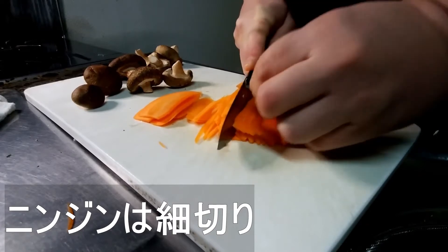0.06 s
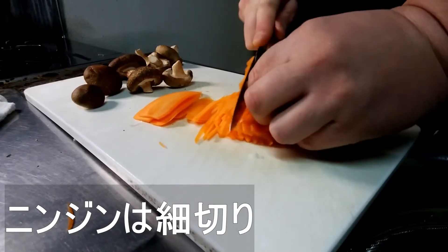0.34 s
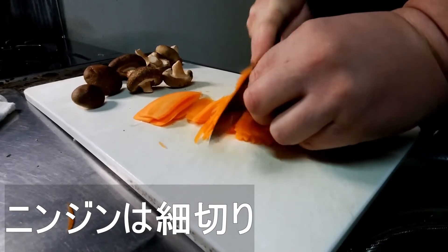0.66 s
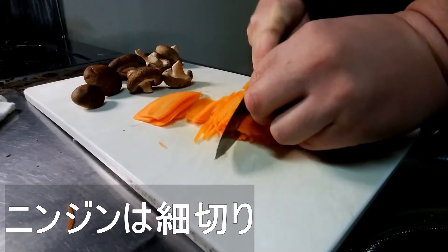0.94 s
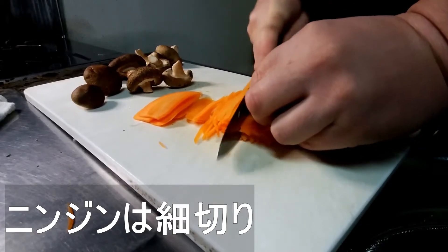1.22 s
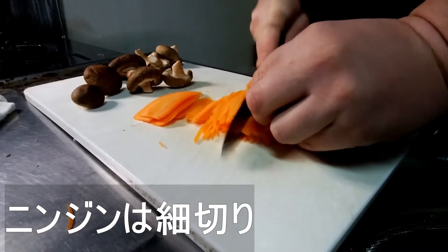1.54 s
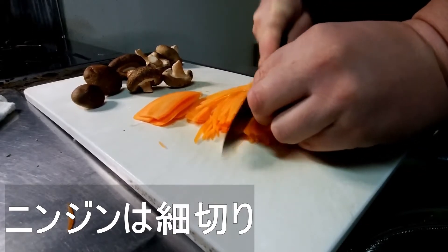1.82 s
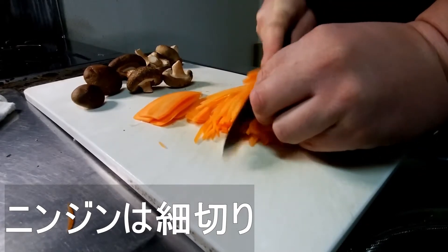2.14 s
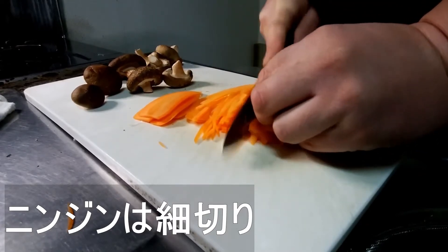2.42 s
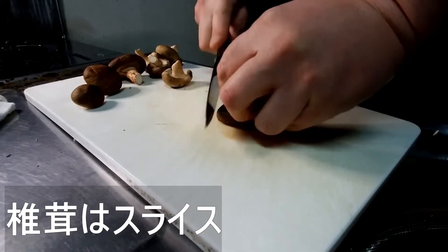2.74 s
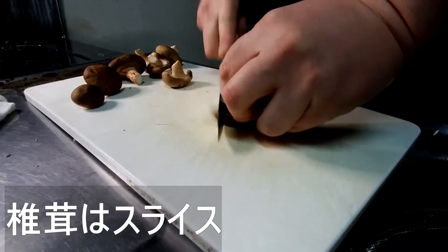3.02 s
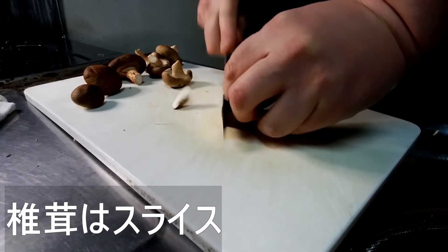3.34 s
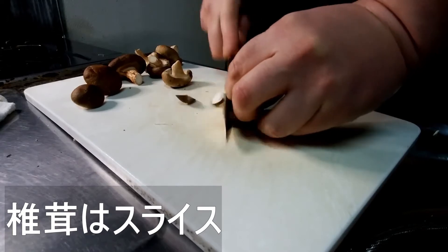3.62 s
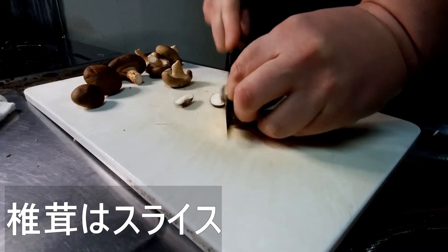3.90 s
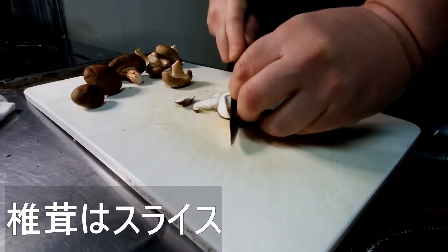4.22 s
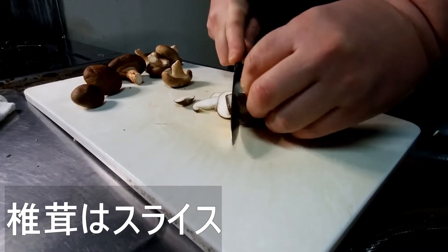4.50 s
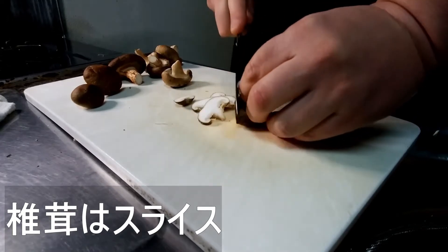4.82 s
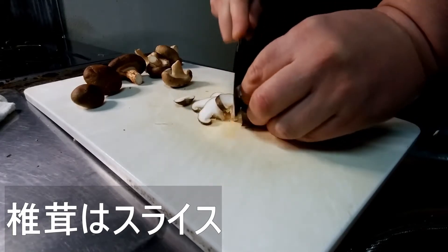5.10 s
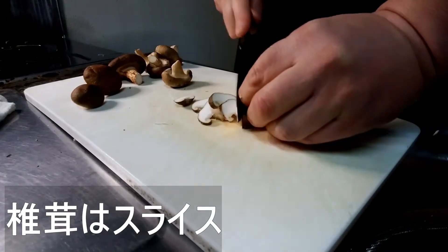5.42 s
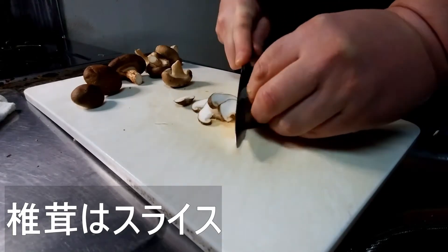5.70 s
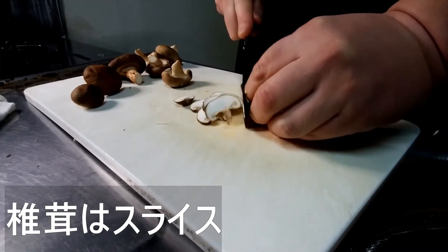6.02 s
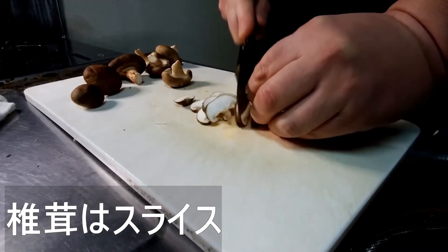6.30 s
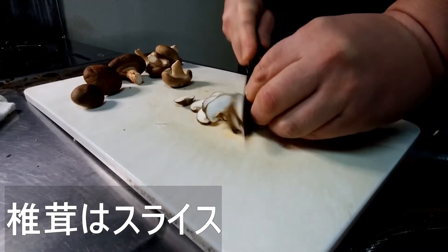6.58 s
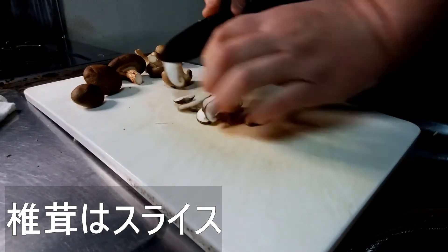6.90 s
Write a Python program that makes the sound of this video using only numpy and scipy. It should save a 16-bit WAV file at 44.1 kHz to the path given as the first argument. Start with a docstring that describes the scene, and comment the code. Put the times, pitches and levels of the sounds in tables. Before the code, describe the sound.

After a few soft bumps of food being shifted, a kitchen knife chops carrot in eight even strokes, each a crisp crunch ending in a boomy knock on a plastic board. The ringing cuts off abruptly. Ten softer-cutting strokes through mushrooms follow, broken by two short pauses, then a light tap. It sounds close, in a small kitchen with faint rumble and hiss.

```python
"""Faint room rumble and hiss, soft bumps of food shifted on a plastic cutting board, then a kitchen knife:
eight strokes through carrot, whose ringing stops abruptly, ten through mushrooms, a last light tap.
Each stroke ticks into the food and presses it down, crunches through its cells, knocks the board, which
booms on its counter in a small kitchen, and lifts past the slice. A peak limiter flattens the knocks."""
import sys
import numpy as np
from scipy import signal
from scipy.fft import rfft, irfft, next_fast_len
from scipy.io import wavfile
from scipy.ndimage import uniform_filter1d, minimum_filter1d, map_coordinates

SR = 44100
rng = np.random.default_rng(int(sys.argv[2]) if len(sys.argv) > 2 else 0)


def dump(signal):
    """Clip the signal to [-1, 1] and save it as 16-bit WAV at the path in sys.argv[1]."""
    limited = np.clip(np.atleast_2d(signal).T, -1, 1)
    pcm = np.round(limited * 32767).astype(np.int16)
    wavfile.write(sys.argv[1], SR, pcm)


N = 315296

# room rumble: freq_hz, density_db
RUMBLE_SPECTRUM = [(18, -39), (30, -16.5), (69, 12), (119, -4.5), (157, 7), (285, -15.5), (802, -23),
                   (886, -23), (2090, -40.5), (3500, -52), (4550, -67), (7700, -120)]
# hiss: freq_hz, density_db
HISS_SPECTRUM = [(1000, -14), (2200, -5), (3000, -10), (4500, -15), (6000, -14.5), (7600, 2), (9000, -5),
                 (11000, -3), (13000, -16), (16000, -7)]
# wavering of the hiss: time_s, level_db
HISS_ENVELOPE = [(0.0, -56), (0.63, -59.5), (2.61, -56.5), (2.81, -62.5), (3.92, -58.5), (4.84, -64),
                 (5.2, -58.5), (6.03, -65.5), (6.33, -59.5), (7.15, -61)]
# hand shifting the food: start_s, level_db, boom_hz
NUDGES = [(0.009, -28.5, 155), (0.167, -17, 153), (0.411, -23, 93), (0.469, -24.5, 88), (2.876, -24, 89),
          (3.031, -17, 82), (6.659, -20.5, 166), (6.763, -21, 81)]
# board, counter and low room resonances: freq_hz, level_db, t60_s
BOARD_MODES = [(60.45, -20, 1), (77, 2, 0.17), (90.06, -6, 0.53), (116.2, -13, 0.73), (154.07, -7.5, 0.79),
               (168.9, -12.5, 1), (184, -7, 0.24), (204.9, -10, 0.97), (262.4, -10.5, 0.13),
               (314.5, -7, 0.37), (391.7, -19.5, 0.59), (438, -25, 0.21), (476.4, -18, 0.23),
               (526, -45, 0.29), (618.4, -8.5, 0.13), (692.6, -8.5, 0.21), (792, -25, 0.26),
               (842, -9, 0.24), (869, -5, 0.044), (889, -11, 0.25), (1199, -12, 0.16), (1214, -14, 0.32),
               (1470, -36, 0.2), (1642, -21, 0.11), (1594, -10, 0.15), (1854, -14.5, 0.12),
               (1973, -15.5, 0.32), (2580, -25.5, 0.28)]
# knife strokes: land_s, knock_db, hardness_oct, cut_s, crunch_db, entry_db, push_db, push_hz
STROKES = [(0.606, -14, 1.12, .112, -18, -26, -20, 201.7), (0.9293, -13, -0.22, 0.1, -18.5, -36, -17, 170),
           (1.2265, -13, 0.84, .063, -16.5, -35, -7.5, 161),
           (1.518, -14, 0.11, 0.074, -15, -18.5, -11.5, 175),
           (1.8097, -13, 0.16, 0.078, -16.5, -23.5, -12.5, 173),
           (2.1119, -13.5, 0.44, 0.078, -17, -28, -11.5, 84),
           (2.399, -14.5, 0.59, 0.062, -17.5, -20.5, -15.5, 77),
           (2.7058, -15.5, 0.51, 0.078, -17.5, -23.5, -18, 80),
           (3.1242, -17, -0.29, 0.027, -34, -27, -23, 170),
           (3.4361, -13.5, 0.082, 0.057, -34, -29, -20, 70),
           (3.726, -11.5, 0.18, 0.052, -31.5, -30, -17.5, 74),
           (4.0067, -14, -0.044, .047, -32.5, -28, -17.5, 95),
           (4.2965, -14.5, 0.0043, .059, -32.5, -39, -17, 78),
           (5.0313, -14.5, -0.15, 0.074, -31.5, -37, -21, 97),
           (5.3209, -18.5, -0.82, .04, -30.5, -29, -14, 176),
           (5.6169, -18.5, -0.97, 0.046, -32.5, -31, -13.5, 178),
           (6.1985, -14, 0.2, 0.04, -28, -36, -25, 81), (6.5378, -18, -0.5, 0.044, -31.5, -31, -20.5, 81),
           (6.8276, -33, -0.41, 0.019, -50, -58, -43, 85)]
# how each food takes the blade:
# swell_db, curve: crunch growth; slide_s, slide_db: its fade after landing; wet_db, t60: its reverb
# snap_db (re crunch), snap_depth (fraction of the cut): flesh splits
# give_db (re knock), give_hz: food yields; weight_db (re knock), weight_hz: arm's weight lands
# heel_db (re knock, at hardness 0): blade heel lands; lift_db, rebound_db: slice tick, boom on lifting
CARROT = dict(swell_db=28.5, curve=1.18, snap_db=-4, snap_depth=0.78, slide_s=0.0037, slide_db=-9.5, give_db=-1.5, give_hz=220, weight_db=-2, weight_hz=145, heel_db=-13.5, lift_db=-35, rebound_db=-19, wet_db=-9, t60=0.32)
MUSHROOM = dict(swell_db=19.5, curve=0.89, snap_db=-2, snap_depth=0.83, slide_s=0.015, slide_db=-0.5, give_db=-7, give_hz=133, weight_db=0, weight_hz=146, heel_db=-19.5, lift_db=-45, rebound_db=-42.5, wet_db=-7.5, t60=0.43)
# bursting plant cells: freq_hz, density_db
CELL_SPECTRUM = [(150, 17.5), (350, 11), (750, 6), (1200, -9.5), (2000, -5), (3100, -1.5), (4000, -4),
                 (6000, -2), (7600, 4.5), (9000, 0), (11200, 2.5), (12800, -16.5), (16000, -15)]
# loose slices touching the blade: start_s, level_db
SLICE_TICKS = [(2.8833, -35.5), (3.5823, -31.5), (3.8097, -35), (5.1943, -29), (5.6845, -27), (5.791, -43),
               (6.6576, -33.5)]
# wash of close overtones in a knock: freq_hz, density_db
WASH_SPECTRUM = [(35, -30.5), (75, -1.5), (128, -18.5), (162, -8), (250, -8), (600, -12.5), (900, -10),
                 (970, -31.5), (1120, -22), (1200, -18.5), (2000, -17.5), (3100, -18), (3900, -23.5),
                 (12000, -24.5)]
# decay of the wash: freq_hz, t60_s
WASH_DECAY = [(100, 0.78), (400, 0.26), (900, 0.37), (1600, 0.33), (2800, 0.27), (8000, 0.36)]
CARROT_END_S = 2.755


def amp(db):
    """Decibels to gain."""
    return 10 ** (np.asarray(db) / 20)


def unit_rms(x):
    """x at rms 1."""
    return x / np.sqrt(np.mean(x ** 2) + 1e-20)


def log_interp(points, hz):
    """Read (freq_hz, value) points on a log axis."""
    freq_hz, values = np.transpose(points)
    return np.interp(np.log(hz + 1), np.log(freq_hz), values)


def shaped(x, spectrum):
    """Minimum-phase filter x by a spectrum; output at rms 1."""
    size = 2 * next_fast_len(len(x) // 2 + 2048)
    gain = amp(log_interp(spectrum, np.fft.rfftfreq(size, 1 / SR)))
    cepstrum = irfft(np.log(gain + 1e-6), size)
    cepstrum[1:size // 2] *= 2
    cepstrum[size // 2 + 1:] = 0
    return unit_rms(irfft(rfft(x, size) * np.exp(rfft(cepstrum)), size)[:len(x)])


def add(track, at_s, sound, lag_s=0):
    """Mix in at at_s + lag_s; carrot sounds stop dead at CARROT_END_S."""
    start = max(round((at_s + lag_s) * SR), 0)
    end = round(CARROT_END_S * SR) if at_s < CARROT_END_S else N
    sound = sound[:max(end - start, 0)]
    track[start:start + len(sound)] += sound


def food_at(time_s):
    """Carrot first, then mushrooms."""
    return CARROT if time_s < CARROT_END_S else MUSHROOM


def background(rumble_db=-45.5, hiss_trim_db=0.5):
    """Low room rumble under a faint, wavering hiss."""
    hiss_db = hiss_trim_db + np.interp(np.arange(N) / SR, *np.transpose(HISS_ENVELOPE))
    rumble = amp(rumble_db) * shaped(rng.standard_normal(N), RUMBLE_SPECTRUM)
    hiss = amp(hiss_db) * shaped(rng.standard_normal(N), HISS_SPECTRUM)
    return rumble + hiss


def mode_rings(build_cycles=0.62):
    """One second of each mode; low ones build up more slowly."""
    t = np.arange(SR) / SR
    rings = []
    for k, (hz, db, t60_s) in enumerate(BOARD_MODES):
        envelope = amp(db - 60 * t / t60_s) * (1 - np.exp(-t * hz / build_cycles))
        rings.append((-1) ** k * envelope * np.sin(2 * np.pi * hz * t))
    return np.array(rings)


def thump(rings, db, boom_hz, damping_s=0.077, press_s=0.0023, reach=1.127, scatter_db=1.5):
    """Dull push on the board: slower pushes reach lower modes; the resting hand damps them."""
    t = np.arange(SR) / SR
    ratio = np.array(BOARD_MODES)[:, 0] / (reach * boom_hz)
    strength = amp(scatter_db * rng.standard_normal(len(rings))) * ratio / (1 + ratio ** 4)
    boom = strength @ rings * (1 - np.exp(-t / press_s)) * np.exp(-t / damping_s)
    return amp(db - 2) * boom / np.abs(boom).max()


def thumps(rings, give_lead_s=0.02117, rebound_lag_s=0.19, rebound_hz=160):
    """The board booms as the blade enters, the food yields, the blade lands and lifts, the hand nudges."""
    track = np.zeros(N)
    for land_s, knock_db, _, cut_s, _, _, push_db, push_hz in STROKES:
        food = food_at(land_s)
        add(track, land_s, thump(rings, push_db, push_hz), -cut_s)
        add(track, land_s, thump(rings, knock_db + food["give_db"], food["give_hz"]), -give_lead_s)
        add(track, land_s, thump(rings, knock_db + food["weight_db"], food["weight_hz"], damping_s=0.028))
        add(track, land_s, thump(rings, food["rebound_db"], rebound_hz), rebound_lag_s)
    for start_s, db, boom_hz in NUDGES:
        add(track, start_s, thump(rings, db, boom_hz))
    return track


def tick(db, decay_s=0.0065, rise_s=0.00078, highpass_hz=2000, room_db=-20, room_t60_s=0.38):
    """Blade touching food: a thin, randomly coloured burst with a faint room tail."""
    t = np.arange(SR // 5) / SR
    highpass = signal.butter(1, highpass_hz, "high", fs=SR, output="sos")
    tail = amp(room_db - 60 * t / room_t60_s)
    envelope = (1 - np.exp(-t / rise_s)) * (np.exp(-t / decay_s) + tail)
    spectrum = [(hz, density_db + 3 * rng.standard_normal()) for hz, density_db in CELL_SPECTRUM]
    noise = shaped(rng.standard_normal(len(t)), spectrum)
    return amp(db - 6.5) * envelope * signal.sosfilt(highpass, noise)


def ticks(lift_lag_s=0.146):
    """The blade opens the skin, splits the flesh, brushes the slice going up; loose slices touch it."""
    track = np.zeros(N)
    for land_s, _, _, cut_s, crunch_db, entry_db, *_ in STROKES:
        food = food_at(land_s)
        add(track, land_s, tick(entry_db), -cut_s)
        add(track, land_s, tick(crunch_db + food["snap_db"]), -cut_s * (1 - food["snap_depth"]))
        add(track, land_s, tick(food["lift_db"]), lift_lag_s)
    for start_s, db in SLICE_TICKS:
        add(track, start_s, tick(db))
    return track


def cell_bursts(length_s, rate_hz=3000, scatter_db=4, fizz=0.14):
    """Irregular tiny bursts, a few of them strong, over a fine fizz."""
    count = max(int(length_s * SR), 64)
    bursts = rng.random(count) < rate_hz / SR
    strength = amp(scatter_db * rng.standard_normal(count))
    return bursts * strength * rng.choice([-1, 1], count) + fizz * rng.standard_normal(count)


def crunches(clump_rate_hz=250, clump_db=3, crisp_hz=12000, crisp_db_per_db=0.1, tail_s=0.041):
    """Cells burst in clumps, harder as the blade gathers speed, and die out as it slides to rest."""
    track = np.zeros(N)
    softest_db = min(stroke[4] for stroke in STROKES[:-1])
    for land_s, _, _, cut_s, crunch_db, *_ in STROKES:
        food = food_at(land_s)
        crisp_db = crisp_db_per_db * (crunch_db - softest_db)  # firm flesh: louder and brighter
        spectrum = [(hz, db + crisp_db * (hz > crisp_hz)) for hz, db in CELL_SPECTRUM]
        grains = shaped(cell_bursts(cut_s + tail_s), spectrum)
        t = np.arange(len(grains)) / SR
        depth = np.minimum(t / cut_s, 1)
        clumps = map_coordinates(rng.standard_normal(SR // 100), [t * clump_rate_hz], mode="wrap")
        swell = amp(crunch_db - food["swell_db"] * (1 - depth ** food["curve"]) + clump_db * clumps)
        slide = amp(food["slide_db"]) * np.exp(-np.abs(t - cut_s) / food["slide_s"])
        crunch = grains * swell * np.where(t < cut_s, 1, slide)
        add(track, land_s, kitchen(crunch, food["wet_db"], food["t60"]), -cut_s)
    return track


def kitchen(x, wet_db, t60_s, rise_s=0.00058):
    """Direct sound plus the small room's diffuse tail."""
    t = np.arange(SR // 2) / SR
    tail = rng.standard_normal(len(t)) * amp(-60 * t / t60_s) * (1 - np.exp(-t / rise_s))
    response = amp(wet_db) * tail / np.linalg.norm(tail)
    response[0] = 1
    return signal.fftconvolve(x, response)


def clack(decay_s=0.011, band_hz=(550, 2900)):
    """First instant of steel on plastic."""
    t = np.arange(SR // 50) / SR
    bandpass = signal.butter(5, band_hz, "band", fs=SR, output="sos")
    burst = rng.standard_normal(len(t)) * np.exp(-t / decay_s)
    return unit_rms(signal.sosfilt(bandpass, burst))


def overtone_wash(noise):
    """Close overtones and reflections, each frequency fading at its own rate."""
    hz, t, bins = signal.stft(noise, SR, nperseg=256)
    decay = amp(-60 * t / log_interp(WASH_DECAY, hz)[:, None])
    _, faded = signal.istft(bins * decay, SR, nperseg=256)
    return shaped(faded[:len(noise)], WASH_SPECTRUM)


def struck_board(rings, noise, scatter_db=2.5, wash_db=-9.5):
    """One blow: the modes at random strengths, plus the wash."""
    ring = amp(scatter_db * rng.standard_normal(len(rings))) @ rings
    ring[:len(noise)] += amp(wash_db) * overtone_wash(noise)
    return ring


def contact(blow, hardness_oct, base_hz=1700):
    """Food left under the edge softens the contact: a low-pass."""
    cutoff_hz = min(base_hz * 2 ** hardness_oct, SR / 4)
    return signal.sosfilt(signal.butter(3, cutoff_hz, fs=SR, output="sos"), blow)


def knocks(rings, spot_share=0.42, clack_db=-12, heel_lag_s=0.037, heel_db_per_oct=11):
    """The tip lands on nearly the same spot each time; the heel follows, louder on hard strokes."""
    track = np.zeros(N)
    spot = rng.standard_normal(SR // 2)
    for land_s, knock_db, hardness_oct, *_ in STROKES:
        noise = np.sqrt(spot_share) * spot + np.sqrt(1 - spot_share) * rng.standard_normal(len(spot))
        tip = struck_board(rings, noise)
        onset = amp(clack_db) * clack()
        tip[:len(onset)] += onset
        add(track, land_s, amp(knock_db - 1.5) * contact(tip, hardness_oct))
        # board already pressed down: no clack
        heel = struck_board(rings, rng.standard_normal(len(spot)))
        heel_db = knock_db + food_at(land_s)["heel_db"] + heel_db_per_oct * hardness_oct
        add(track, land_s, amp(heel_db) * contact(heel, hardness_oct=0.4), heel_lag_s)
    return track


def scene():
    """Knife, food and board in the kitchen; mono."""
    rings = mode_rings()
    return (knocks(rings) + thumps(rings) + crunches() + ticks() + background())[None]


def limiter(x, ceiling_db, release_db_per_s):
    """Gain ducks just ahead of each peak and climbs back steadily."""
    window = SR // 700
    over_db = np.maximum(20 * np.log10(np.abs(x) + 1e-9) - ceiling_db, 0)
    climb_db = release_db_per_s * np.arange(N) / SR
    duck_db = np.maximum.accumulate(over_db + climb_db, axis=-1) - climb_db
    return x * amp(uniform_filter1d(minimum_filter1d(-duck_db, window), window))


def record(dry):
    """Peak limiter, then a 16 kHz band limit."""
    limited = limiter(dry, ceiling_db=-9, release_db_per_s=183)
    passband = np.fft.rfftfreq(N, 1 / SR) < 16000
    return irfft(rfft(limited) * passband, N)


dry = scene()
out = record(dry)
dump(out)
```